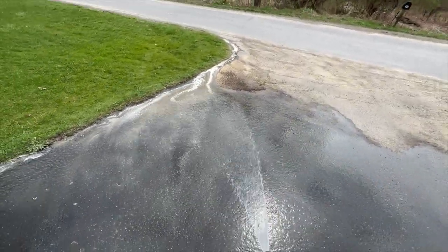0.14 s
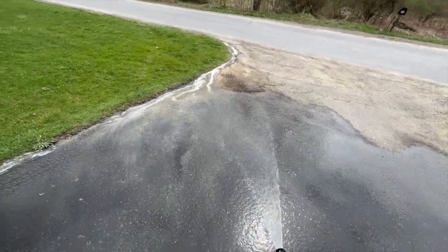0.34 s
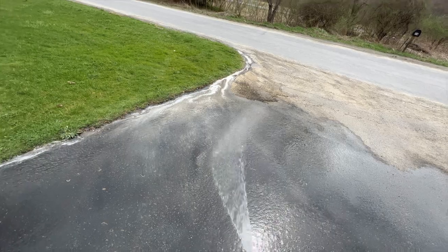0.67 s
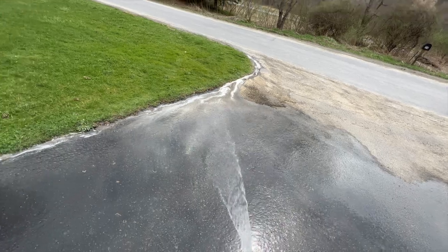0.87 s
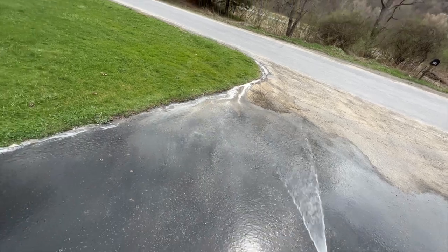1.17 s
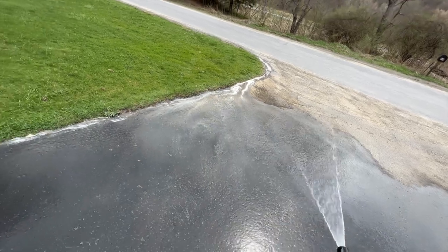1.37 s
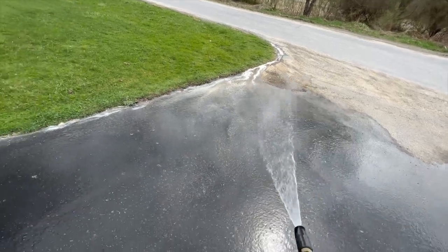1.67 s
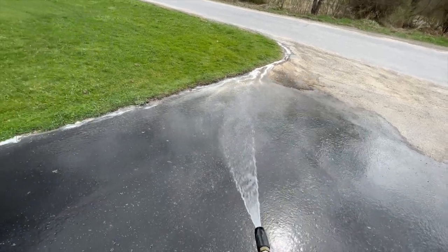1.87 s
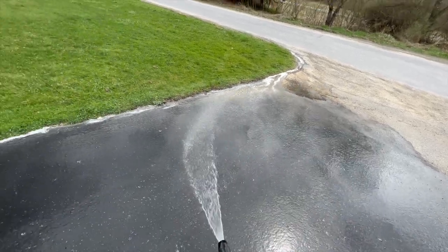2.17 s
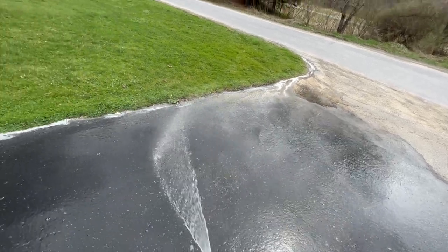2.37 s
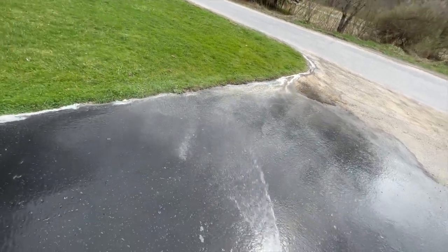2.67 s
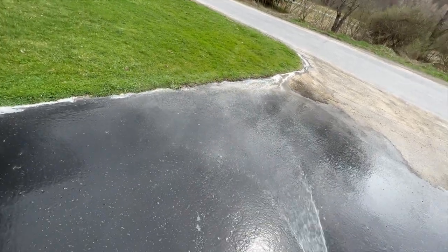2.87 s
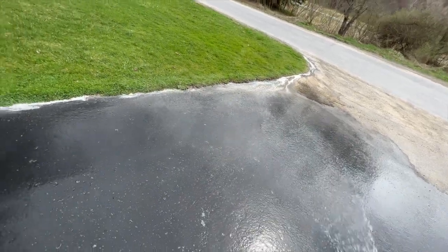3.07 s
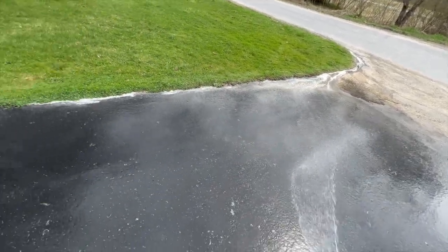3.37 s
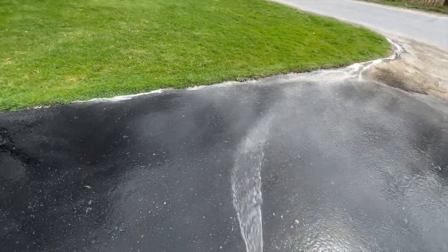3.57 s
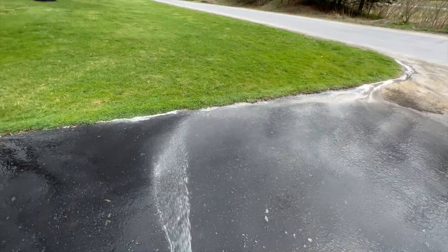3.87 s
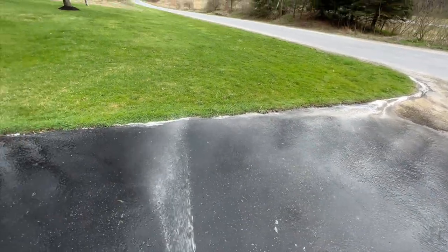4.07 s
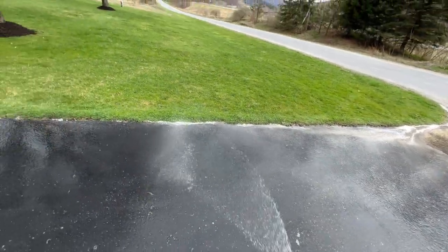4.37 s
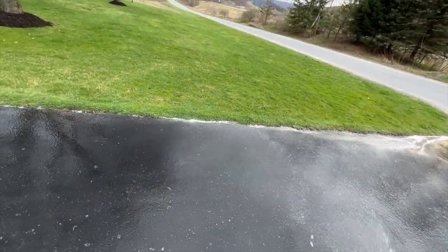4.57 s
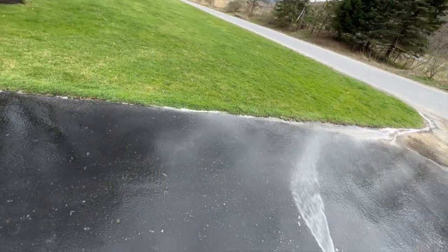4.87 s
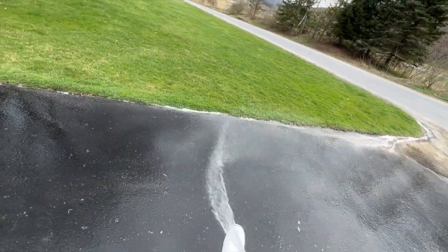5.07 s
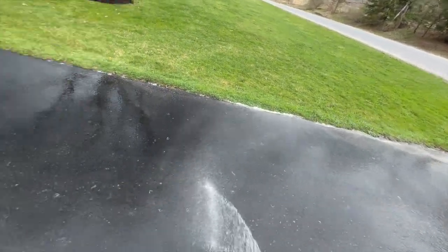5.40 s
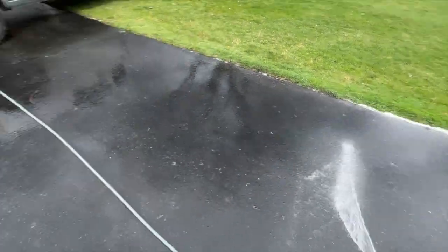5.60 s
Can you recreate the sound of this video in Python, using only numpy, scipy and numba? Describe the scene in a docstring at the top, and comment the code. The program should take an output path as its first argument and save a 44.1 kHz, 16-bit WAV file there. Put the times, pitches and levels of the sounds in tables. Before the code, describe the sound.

A petrol pressure washer chugs steadily while its spray roars and hisses over wet asphalt outdoors, with wind buffeting the microphone.

```python
"""A wet asphalt driveway, heard from just behind the wand of a petrol pressure washer.
Engine firings ring a muffler; shaft-rate tones, rattle and filtered noise make the rest of the machine.
Random drop impacts, filtered by place, make the jet's roar, nozzle note, hiss and mist;
short noise bursts make the splats.
Partly shared low noise, swelling in gusts, buffets the two microphone ports."""
import sys
import numpy as np
from scipy import signal
from scipy.fft import rfft, irfft, next_fast_len
from scipy.io import wavfile
from scipy.ndimage import uniform_filter1d
from numba import njit

SR = 44100
rng = np.random.default_rng(int(sys.argv[2]) if len(sys.argv) > 2 else 0)


def log_audio(samples):
    """Write samples as a 16-bit WAV file to the path given in sys.argv[1]."""
    # one column per channel
    frames = np.atleast_2d(samples).T
    # limit to full scale, then quantise
    limited = np.clip(frames, -1, 1)
    pcm = np.round(limited * 32767).astype(np.int16)
    wavfile.write(sys.argv[1], SR, pcm)


N = 253134
T = np.arange(N) / SR
ENGINE_HZ, FIRST_FIRING_S = 30.42, .0275  # firing rate, first firing
TOP_HZ = 15900

# engine thud as the listener turns, before trim and brightening: time_s, level_db
ENGINE_LEVEL = [(0, -32), (0.25, -49), (0.45, -38.5), (0.7, -33.5), (1.3, -35.5), (1.7, -47.5), (2.05, -42),
                (2.5, -32.5), (2.8, -39), (3.42, -32.5), (3.68, -47), (3.9, -41.5), (4.1, -29),
                (4.75, -26.5), (5.2, -27.5), (5.7, -24)]
# muffler and casing resonances: centre_hz, width_hz, relative_db
MUFFLER_MODES = [(72.3, 16.3, -1.5), (180.8, 65, 1.5), (277.8, 61, -1)]
# muffler's upper ring against its lower: time_s, gain_db
UPPER_RING = [(0.55, -4.5), (1.3, -2), (3.2, 3), (4.3, -1), (5.7, 0.5)]
# outline isolating the upper ring: freq_hz, gain_db
UPPER_RING_COLOUR = [(190, -40), (245, 0)]
# crankshaft hum, before waver: time_s, level_db
HUM_LEVEL = [(0.2, -52), (.95, -41), (1.38, -38), (1.65, -59.5), (2.55, -41), (2.8, -54), (3.9, -55),
             (4.8, -32), (5.15, -60), (5.65, -35.5)]
# cooling fan and pump rush as the listener turns: time_s, level_db, port_lag_ms
RUSH_PATH = [(0, -46, .66), (0.5, -45, .66), (0.95, -43, 0.66), (1.7, -42.5, 0.58), (2.5, -41, 0.53),
             (3.3, -42, 0.42), (3.9, -41, 0.72), (4.5, -37.5, 0.7), (5.25, -40.5, 0.8), (5.65, -49.5, .98)]
# rush spectrum: freq_hz, relative_db
RUSH_SPECTRUM = [(200, -10.5), (450, -9), (700, -1), (900, 2.5), (1120, -1.5), (1350, -10), (2500, -49)]
# valve and piston rattle spectrum: freq_hz, relative_db
CLATTER_SPECTRUM = [(330, -18), (480, 1), (720, 6), (1400, -24)]
# thin wavering pump tones, before PUMP_GAIN and waver: firing_rate_multiple, level_db
PUMP_TONES = [(13, -59.5), (20, -57), (34, -62.5), (38, -62.5), (60, -61)]
# clarity of the pump tones: time_s, gain_db
PUMP_GAIN = [(0, -14), (2.8, -3), (3.7, 1), (4.9, 7.5), (5.74, 0.5)]
# jet striking the ground: time_s, level_db, band_centre_hz, port_lag_ms
IMPACT_PATH = [(0.6, -46, 1410, .16), (1.08, -40, 1250, 0.15), (1.35, -42.5, 1350, .17),
               (1.95, -44.5, 1480, 0.14), (2.3, -43.5, 1450, 0.37), (3.3, -42.5, 1520, 0.35),
               (3.8, -47, 1500, 0.35), (5.3, -47, 1500, 0.22), (5.6, -46, 1420, .1)]
# broad splash roar, before pan: time_s, level_db, port_lag_ms
SPLASH_PATH = [(0.3, -44, 0.58), (0.8, -39.5, .45), (1.9, -39.5, 0.5), (2.6, -42.5, 0.45), (3.9, -43, 0.29),
               (4.6, -39, 0.23), (5.35, -40.5, 0.21), (5.7, -36.5, 0.082)]
# splash spectrum: freq_hz, relative_db
SPLASH_SPECTRUM = [(300, -10), (900, -5.5), (2100, -2), (2900, -5.5), (3700, -13.5), (6000, -40),
                   (12000, -67)]
# nozzle's breathy note: time_s, centre_hz
NOZZLE_CENTRE = [(0.25, 2420), (1.62, 2653), (2.0, 2490), (3.25, 2576), (3.6, 2467), (4.35, 2520),
                 (4.72, 2650), (5.1, 2430), (5.6, 2565)]
# note flares as the wand swings: peak_s, length_s, level_db, left_minus_right_db
NOZZLE_FLARES = [(0.402, 0.53, -53.5, -4), (1.48, 0.31, -41.5, 8), (2.107, 0.63, -45, -2.5),
                 (3.118, 0.25, -43, -4), (3.756, 0.35, -37.5, 6.5), (4.242, 0.15, -36, 6.5),
                 (4.774, 0.35, -39.5, -1), (5.12, 0.23, -36, 16), (5.632, 0.43, -32.5, 7.5)]
# note between flares: level at time zero, steady growth
NOZZLE_START_DB, NOZZLE_RISE_DB_PER_S = -54.5, 1.97
# fan hiss, before trim: time_s, level_db
HISS_LEVEL = [(0.05, -50), (0.35, -48.5), (3.05, -46.5), (5.7, -47.5)]
# hiss spectrum: freq_hz, relative_db
HISS_SPECTRUM = [(2500, -11.5), (3700, -14), (4300, -5), (5100, -1), (6200, 0), (7800, -11.5), (9000, -8),
                 (12000, -70)]
# hiss balance, set on the left port: freq_hz, left_minus_right_db
HISS_BALANCE = [(3500, -14), (4300, -1.5), (5200, -10), (6700, -13), (8500, 0.5)]
# fine mist, before trim, surging near the end: time_s, level_db
MIST_LEVEL = [(0.0, -50.5), (3.87, -45.5), (4.78, -46), (5.08, -43.5), (5.2, -38), (5.74, -38.5)]
# mist and splat spectrum: freq_hz, relative_db
MIST_SPECTRUM = [(1500, -25), (4000, -10), (6600, -7), (7600, -2.5), (9000, -1), (10500, -4), (15500, -4.5)]
# thin sizzle high in the spray: time_s, level_db, centre_hz
SIZZLE_PATH = [(1.1, -54.5, 7700), (1.5, -50.5, 7600), (2.6, -52, 7740), (3.83, -47.5, 7420),
               (4.7, -51, 7480), (5.3, -47, 7170)]
# breeze between gusts: buffeting, deep rumble, left minus right
BREEZE_DB, RUMBLE_DB, BREEZE_PAN_DB = -44, -44, 3
# gusts on the ports: peak_s, length_s, buffet_db, rumble_db, flutter_db, left_minus_right_db
GUST_EVENTS = [(0.063, 0.05, -33.5, -33.5, -47, -2), (1.386, 0.29, -38, -35, -46, 4),
               (1.531, 0.064, -29, -35, -32, -3), (1.612, 0.022, -36, -42, -31.5, -10),
               (2.623, 0.19, -37, -43, -45.5, 2), (3.17, 0.47, -38, -45.5, -38.5, 2),
               (3.528, 0.054, -43, -35, -31.5, -2), (4.947, 0.08, -29, -34, -55, -4),
               (5.148, 0.26, -29.5, -46, -35.5, 2), (5.396, 0.17, -26, -52, -33.5, 7),
               (5.644, 0.2, -45, -31.5, -47, 1)]
# small-eddy buffeting spectrum: freq_hz, relative_db
BUFFET_SPECTRUM = [(25, -35), (42, -20), (60, -14), (100, -2), (180, 4.5), (270, -0.5), (370, -18),
                   (600, -23), (1500, -63)]
# large-eddy rumble spectrum: freq_hz, relative_db
RUMBLE_SPECTRUM = [(25, -35), (42, -23), (60, 1.5), (95, -1), (150, -17), (250, -61)]
# smallest-eddy flutter spectrum: freq_hz, relative_db
FLUTTER_SPECTRUM = [(130, -5), (250, 6.5), (340, 2.0), (430, -8), (900, -15.5), (2500, -78)]
# bright hiss sweeps, before drift and throb: peak_s, length_s, level_db, centre_hz, left_minus_right_db
SWEEP_EVENTS = [(0.66, 0.25, -47, 5600, -24), (1.34, 0.67, -42.5, 5370, -14),
                (2.98, 0.57, -46.5, 4700, -14.5), (4.35, 0.17, -47, 4530, 2),
                (4.823, 0.22, -47.5, 4960, -12), (5.69, 0.15, -44, 3760, -8), (5.673, 0.11, -39, 5900, -14)]
# larger drops landing close by: start_s, level_db
SPLAT_EVENTS = [(2.683, -37), (5.2, -30.5)]


def undb(db):
    """Decibels to gain."""
    return 10 ** (np.asarray(db) / 20)


def curves(table):
    """Columns of a time table, one value a sample."""
    time_s, *columns = np.transpose(table)
    return [np.interp(T, time_s, column) for column in columns]


def unit(x):
    """Scale to rms 1."""
    return x / np.sqrt(np.mean(x ** 2))


def colour(x, points):
    """Filter by a (freq_hz, gain_db) outline, straight in log frequency."""
    size = next_fast_len(N)
    freq_hz, gain_db = np.transpose(points)
    f = np.maximum(np.fft.rfftfreq(size, 1 / SR), 1)
    gain = undb(np.interp(np.log(f), np.log(freq_hz), gain_db))
    return irfft(rfft(x, size) * gain, size)[..., :N]


def ports(x, lag_ms):
    """One sound at both ports, the right one later; the lag may move."""
    late = np.arange(N) - np.round(lag_ms * SR / 1000).astype(int)
    return np.array([x, x[late % N]])


def pan(db):
    """Left and right gains for a level difference, mean power kept."""
    gains = undb(np.array([db, -db]) / 2).reshape(2, -1)
    return gains / np.sqrt(np.mean(gains ** 2, axis=0))


def walk(rate_hz):
    """Smooth random curve with rms 1, from held random steps."""
    k = int(SR / rate_hz)
    held = np.repeat(rng.standard_normal(N // k + 1), k)
    return unit(uniform_filter1d(uniform_filter1d(held, k), k)[:N])


def swell(peak_s, length_s):
    """Bell-shaped rise and fall of power; length is taken at half height."""
    return .5 ** ((2 * (T - peak_s) / length_s) ** 2)


def puff(cycles, decay_cycles=0.35, lead_cycles=0.052):
    """Envelope, rms 1, that jumps as the exhaust valve opens and dies within the firing cycle."""
    decay = np.exp(-((cycles + lead_cycles) % 1) / decay_cycles)
    return unit(uniform_filter1d(decay, size=40))


def patter(drops_per_s, spread_db):
    """Drop impacts of very unequal size, as impulses at random times."""
    count = int(drops_per_s * N / SR)
    size_db = spread_db * np.minimum(rng.exponential(size=count), 5)
    sizes = rng.standard_normal(count) * undb(size_db)
    return unit(np.bincount(rng.integers(0, N, count), sizes, N))


def spray(drops_per_s, spread_db, shared, lag_ms):
    """Patter at two ports: a direct share common to both, the rest scattered."""
    scattered = np.array([patter(drops_per_s / 2, spread_db) for _ in range(2)])
    direct = ports(patter(drops_per_s, spread_db), lag_ms)
    return np.sqrt(shared) * direct + np.sqrt(1 - shared) * scattered


def swirl(x, depth_db, patch_hz, patch_s, size=512):
    """Patches of the spectrum swell and sink as the fan of water moves."""
    f, t, z = signal.stft(x, SR, nperseg=size)
    field = rng.standard_normal(z.shape[1:])
    for _ in range(2):
        field = uniform_filter1d(field, max(1, int(patch_hz / f[1])), axis=0)
        field = uniform_filter1d(field, max(1, int(patch_s / t[1])), axis=1)
    return signal.istft(z * undb(depth_db * unit(field)), SR, nperseg=size)[1][:, :N]


@njit
def resonate(x, centre_hz, width_hz):
    """State-variable band-pass with a moving centre, on both channels."""
    y = np.empty_like(x)
    for c in range(2):
        band_state, low_state = 0., 0.
        for i in range(x.shape[1]):
            g = np.tan(np.pi * centre_hz[i] / SR)
            k = width_hz / centre_hz[i]
            v = (band_state + g * (x[c, i] - low_state)) / (1 + g * (g + k))
            band_state = 2 * v - band_state
            low_state = low_state + 2 * g * v
            y[c, i] = k * v
    return y


def band(x, centre_hz, width_hz):
    """Two equal moving band-passes in series, rms 1; the width is per stage."""
    once = resonate(x, centre_hz, float(width_hz))
    return unit(resonate(once, centre_hz, float(width_hz)))


def muffler_ring(late_hz=100, late_width_hz=100, size=16384):
    """Causal ring of the muffler's steep resonances after one firing; its lows arrive last."""
    f = np.fft.rfftfreq(size, 1 / SR)
    gain = sum(undb(db) / (1 + (2 * (f - hz) / width) ** 2) for hz, width, db in MUFFLER_MODES)
    gain = gain * f ** 4 / (f ** 4 + 45 ** 4) + undb(-131)  # a small outlet radiates no deep bass
    cepstrum = irfft(np.log(gain))  # folded to minimum phase
    cepstrum[1:size // 2] *= 2
    cepstrum[size // 2 + 1:] = 0
    pole = late_hz ** 2 - f ** 2 + 1j * f * late_width_hz
    all_pass = np.conj(pole) / pole
    return -irfft(np.exp(rfft(cepstrum)) * all_pass)


def engine(trim_db=-0.66, scatter_db=0.46, wander_s=0.00039):
    """Each firing of the governed engine rings the muffler; the pace wanders very slightly."""
    times_s = np.arange(FIRST_FIRING_S, T[-1], 1 / ENGINE_HZ)
    wandered_s = times_s + wander_s * np.interp(times_s, T, walk(1.946))
    at = np.clip(wandered_s * SR, 0, N - 1).astype(int)
    firings = np.bincount(at, undb(scatter_db * rng.standard_normal(len(times_s))), N)
    thud = unit(signal.fftconvolve(firings, muffler_ring())[:N])
    upper = colour(thud, UPPER_RING_COLOUR)
    thud = thud + (undb(curves(UPPER_RING)[0]) - 1) * upper
    return ports(thud * undb(curves(ENGINE_LEVEL)[0] + trim_db), lag_ms=0.86) * pan(db=2.5)


def hum(cycles, waver_db=2.6):
    """The crankshaft turns twice per firing and shakes the machine's frame."""
    tone = -np.sqrt(2) * np.cos(2 * np.pi * 2 * cycles)
    level_db = curves(HUM_LEVEL)[0] + waver_db * walk(8.8)
    return ports(tone * undb(level_db), lag_ms=0.92)


def clatter(cycles, trim_db=-10.5, size=1450):
    """Valves and pistons repeat one noise rattle every cycle: faint overtones above the thud."""
    level_db, lag_ms = curves(RUSH_PATH)
    one_cycle = rng.standard_normal(size)
    rattle = one_cycle[(cycles % 1 * size).astype(int) % size] * puff(cycles)
    return unit(colour(ports(rattle, lag_ms), CLATTER_SPECTRUM)) * undb(level_db + trim_db)


def rush(cycles, throb=0.16):
    """Cooling air and pump noise come from the side and swell a little at each firing."""
    level_db, lag_ms = curves(RUSH_PATH)
    air = colour(spray(20000, 2.4, shared=0.73, lag_ms=lag_ms), RUSH_SPECTRUM)
    return unit(air * (1 + throb * (puff(cycles) - 1))) * undb(level_db)


def pump(cycles, waver_db=3, drift_rad=0.7):
    """Thin tones at multiples of the firing rate, wavering in level and phase."""
    tones = 0
    for multiple, db in PUMP_TONES:
        level = undb(db + waver_db * walk(7))
        tones = tones + level * np.sin(2 * np.pi * multiple * cycles + drift_rad * walk(7))
    return ports(np.sqrt(2) * undb(curves(PUMP_GAIN)[0]) * tones, lag_ms=0.13)


def impact(width_hz=640):
    """The jet drums on wet asphalt; its ringing band and port delay shift with the wand."""
    level_db, centre_hz, lag_ms = curves(IMPACT_PATH)
    drops = spray(12000, 1.9, shared=0.93, lag_ms=lag_ms)
    return band(drops, centre_hz, width_hz) * undb(level_db)


def splash():
    """Water thrown off the ground roars broadly around the point of impact."""
    level_db, lag_ms = curves(SPLASH_PATH)
    roar = colour(spray(12000, 3.0, shared=0.38, lag_ms=lag_ms), SPLASH_SPECTRUM)
    roar = unit(swirl(roar, depth_db=2.36, patch_hz=200, patch_s=0.07))
    return roar * undb(level_db) * pan(db=3.0)


def nozzle(skirt_hz=580, core_hz=175):
    """Turbulence at the tip rings one resonance that slides and flares as the wand swings."""
    centre_hz, = curves(NOZZLE_CENTRE)
    lag_ms = np.minimum(curves(SPLASH_PATH)[1], 0.31)
    note = resonate(spray(20000, 2.95, shared=0.7, lag_ms=lag_ms), centre_hz, float(skirt_hz))
    note = resonate(note, centre_hz, float(core_hz))
    flares = sum(swell(s, length) * (undb(db) * pan(side)) ** 2 for s, length, db, side in NOZZLE_FLARES)
    power = undb(NOZZLE_START_DB + NOZZLE_RISE_DB_PER_S * T) ** 2 + flares
    return unit(note) * np.sqrt(power)


def fan(cycles, hiss_trim_db=3, mist_trim_db=1, hiss_throb=0.11, mist_throb=0.06):
    """The sheet of water tears into drops and mist; both throb with the engine and flicker together."""
    pulse = puff(cycles) - 1
    hiss = colour(spray(60000, 0.45, shared=0.031, lag_ms=0.315), HISS_SPECTRUM)
    hiss = np.array([colour(hiss[0], HISS_BALANCE), hiss[1]])
    hiss = swirl(hiss, depth_db=2.5, patch_hz=350, patch_s=0.17)
    hiss = unit(hiss * (1 + hiss_throb * pulse)) * undb(curves(HISS_LEVEL)[0] + hiss_trim_db)
    mist = colour(spray(18000, 2.6, shared=.75, lag_ms=.26), MIST_SPECTRUM)
    mist = swirl(mist, depth_db=.6, patch_hz=300, patch_s=.08)
    mist = unit(mist * (1 + mist_throb * pulse)) * undb(curves(MIST_LEVEL)[0] + mist_trim_db)
    return undb(0.74 * walk(25.3)) * (hiss + mist)


def sizzle(width_hz=1100):
    """The finest drops sizzle in a narrow band that slides with the wand."""
    level_db, centre_hz = curves(SIZZLE_PATH)
    drops = spray(18000, 4.0, shared=0.85, lag_ms=.28)
    return band(drops, centre_hz, width_hz) * undb(level_db) * pan(db=-9)


def eddies(points, shared, waver_db):
    """Unsteady air pressure at the ports, partly common to both, rms 1."""
    common = ports(rng.standard_normal(N), lag_ms=1.0)
    air = np.sqrt(shared) * common + np.sqrt(1 - shared) * rng.standard_normal((2, N))
    return unit(colour(air, points) * undb(waver_db * walk(45)))


def wind():
    """Gusts swell over a breeze: small eddies thump, large ones rumble, the smallest flutter higher."""
    buffet_power = np.square(undb(BREEZE_DB) * pan(BREEZE_PAN_DB))
    rumble_power = np.square(undb(RUMBLE_DB))
    flutter_power = 0
    for peak_s, length_s, *levels_db, side_db in GUST_EVENTS:
        buffet, deep, fast = (swell(peak_s, length_s) * np.square(undb(db) * pan(side_db)) for db in levels_db)
        buffet_power = buffet_power + buffet
        rumble_power = rumble_power + deep
        flutter_power = flutter_power + fast
    thumps = np.sqrt(buffet_power) * eddies(BUFFET_SPECTRUM, shared=0.37, waver_db=2.0)
    rumble = np.sqrt(rumble_power) * eddies(RUMBLE_SPECTRUM, shared=0.3, waver_db=1.5)
    flutter = np.sqrt(flutter_power) * eddies(FLUTTER_SPECTRUM, shared=0.3, waver_db=3.0)
    return thumps + rumble + flutter


def sweeps(cycles, width_hz=2300, throb=0.48, drift=0.088):
    """Each swing of the fan throws a drifting, grainy hiss, mostly right; the exhaust's chuff pulses through it
    at each firing."""
    out = 0
    drops = spray(9000, 2.9, shared=0.48, lag_ms=0.26)
    slide = np.exp(drift * walk(3.63))
    for peak_s, length_s, level_db, centre_hz, side_db in SWEEP_EVENTS:
        envelope = np.sqrt(swell(peak_s, length_s)) * undb(level_db)
        out = out + band(drops, centre_hz * slide, width_hz) * envelope * pan(side_db)
    return out * (1 + throb * (puff(cycles) - 1))


def splats(decay_s=0.0044):
    """Single drops tick: short bright noise bursts with exponential decay."""
    envelope = sum(undb(db) * (T >= s) * np.exp(-np.abs(T - s) / decay_s) for s, db in SPLAT_EVENTS)
    noise = unit(colour(rng.standard_normal(N), MIST_SPECTRUM))
    return ports(envelope * noise, lag_ms=.27)


def scene():
    """Machine, water and wind together."""
    cycles = (T - FIRST_FIRING_S) * ENGINE_HZ  # firing cycles
    machine = engine() + hum(cycles) + clatter(cycles) + rush(cycles) + pump(cycles)
    water = impact() + splash() + nozzle() + fan(cycles) + sizzle() + sweeps(cycles) + splats()
    return machine + water + wind()


def record(dry):
    """Steep elliptic low-pass at TOP_HZ."""
    return signal.sosfilt(signal.ellip(10, .2, 80, TOP_HZ, fs=SR, output="sos"), dry)


dry = scene()
out = record(dry)
log_audio(out)
```